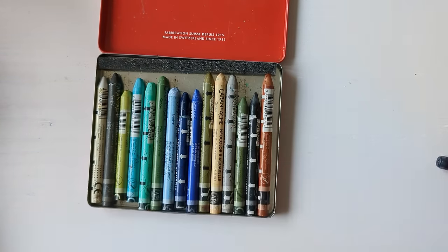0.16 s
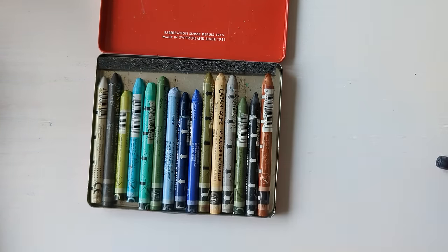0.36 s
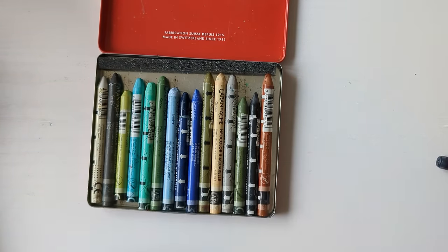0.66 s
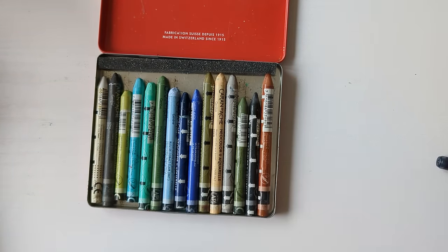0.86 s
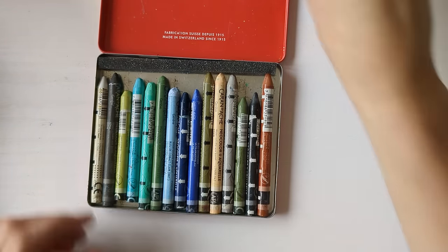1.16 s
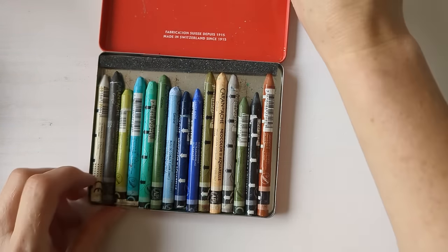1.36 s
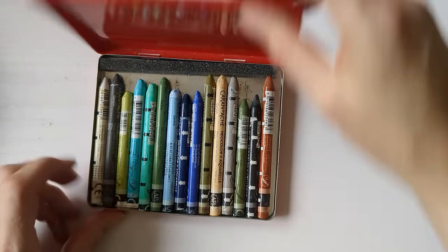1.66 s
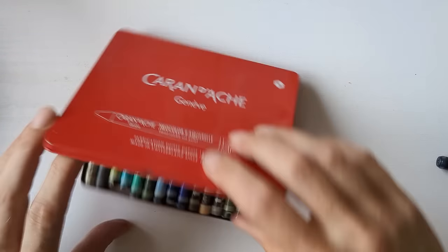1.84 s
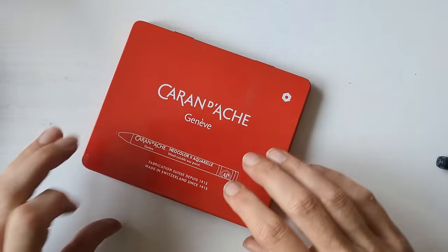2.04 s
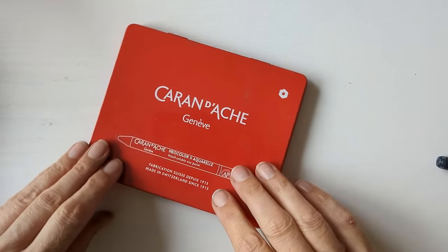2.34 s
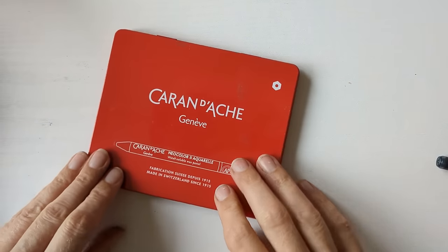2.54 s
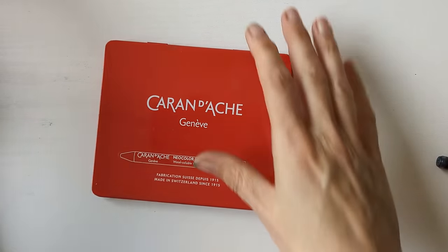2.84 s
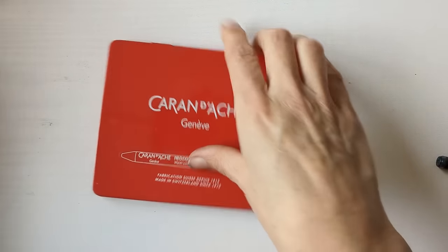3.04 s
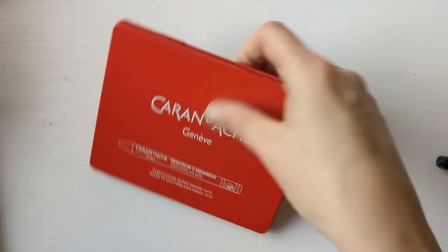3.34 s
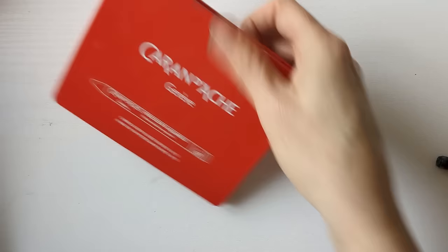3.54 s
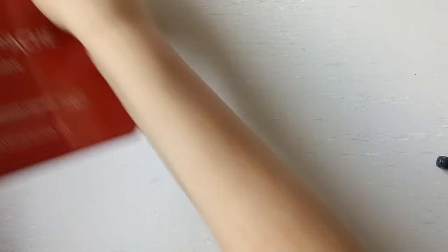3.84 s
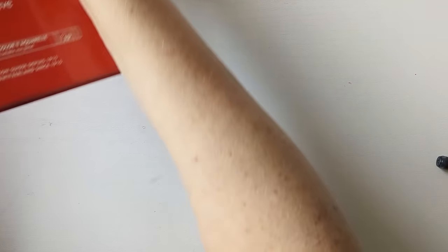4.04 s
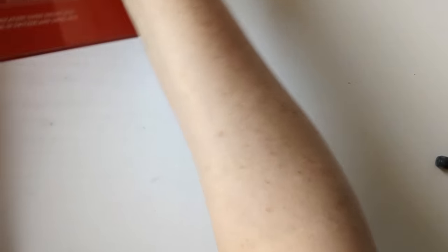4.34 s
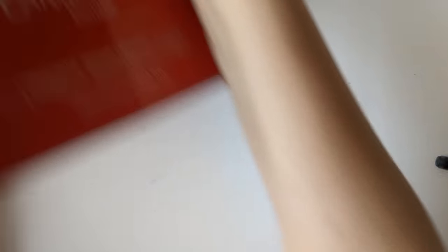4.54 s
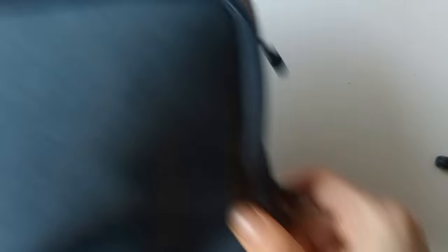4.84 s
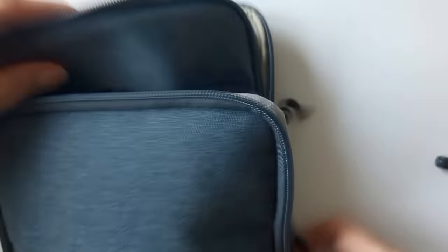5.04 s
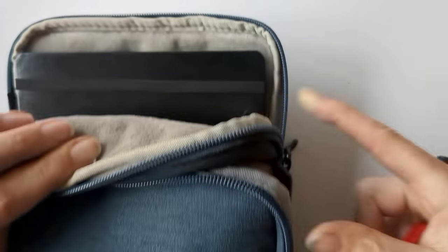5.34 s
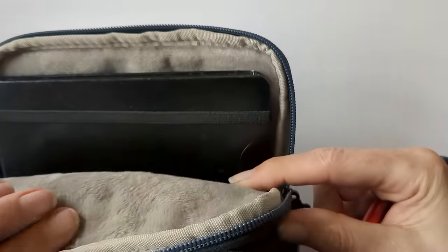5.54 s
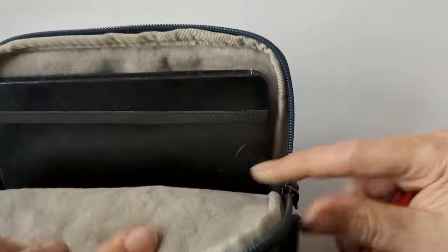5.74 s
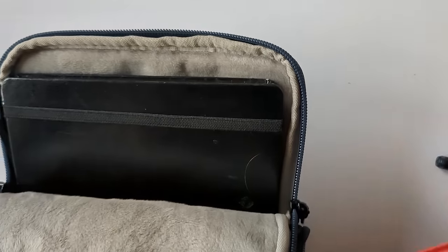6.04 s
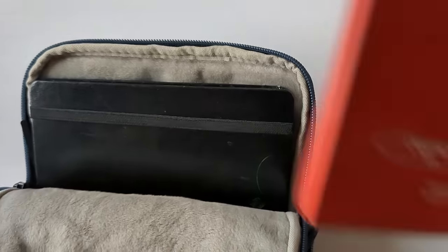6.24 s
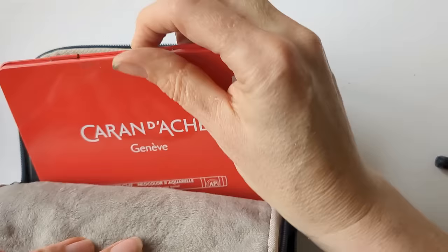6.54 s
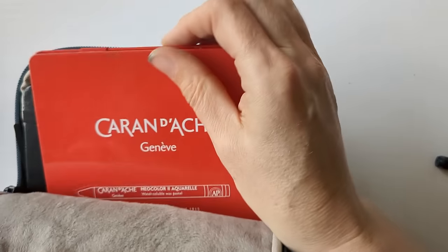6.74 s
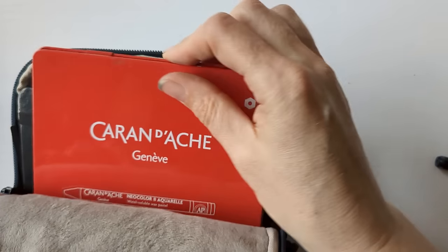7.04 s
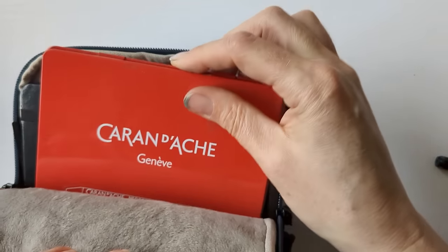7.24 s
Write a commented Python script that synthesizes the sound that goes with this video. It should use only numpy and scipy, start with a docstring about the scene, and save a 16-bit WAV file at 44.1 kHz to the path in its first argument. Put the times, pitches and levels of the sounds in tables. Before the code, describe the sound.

Close stereo microphone in a small quiet room. After a nearly silent opening, a thin metal lid clacks and snaps shut on a tin of wax crayons. The tin scrapes and rattles as it is lifted. A padded fabric case lands with soft flaps, rustles open with tiny zip tinkles and a snap, then takes the tin with a cluster of hollow knocks.

```python
"""Over faint rumble and air noise in a small quiet room, a flat metal tin of wax crayons is closed on a table:
the lid drops, snaps shut, and the crayons clatter as the tin is lifted. A padded fabric case is pulled over and
flopped open, its zip pulls tinkling, and the tin is pushed inside. Knocks and bumps are noise bursts with struck
modes, rubbing is trains of tiny slips, slides are noise on a gliding pitch, tinkles are high modes set chattering."""
import sys
import numpy as np
from scipy import signal
from scipy.fft import rfft, irfft, next_fast_len
from scipy.io import wavfile

SR = 44100
rng = np.random.default_rng(int(sys.argv[2]) if len(sys.argv) > 2 else 0)


def wav_out(sig):
    """Save sig, one row per channel (or a flat mono array), as 16-bit PCM at SR to the path in sys.argv[1]."""
    wavfile.write(sys.argv[1], SR, np.round(np.clip(np.atleast_2d(sig).T, -1, 1) * 32767).astype(np.int16))


N = 325450
TIME = np.arange(N) / SR
HIT = SR // 3  # samples that one blow lasts

# Levels in the tables are relative: each layer is trimmed again where it is mixed.
# spectrum of bright ticks and scuffs: (frequency [Hz], density [dB per Hz])
TICK_COLOUR = [(2000, 1.5), (3700, 1), (5200, -6), (6600, -5), (8000, -9), (10500, -2.5), (13000, -7.5),
               (16000, -19)]
# rumble of table and room: (frequency [Hz], density [dB per Hz])
RUMBLE_SPECTRUM = [(22, -16), (45, 0.5), (65, 4), (90, 0), (125, 7), (180, -7.5), (320, -16.5)]
# resonances in the hollow of the case: (frequency [Hz], level [dB], t60 [s])
HOLLOW_MODES = [(354.5, 0, 0.054), (414, -5, 0.16), (457, -1.5, 0.14), (507, -4, 0.17), (534.6, 2, 0.1),
                (656, -11, 0.13), (696, -11, 0.082), (817, 0, 0.046), (920, -18, 0.042), (997, 2, 0.056)]


def from_db(db):
    """Decibels to gain."""
    return 10 ** (np.asarray(db) / 20)


def rms_one(x):
    """Scale to rms 1."""
    return x / np.sqrt(np.mean(x ** 2) + 1e-20)


def unit_blow(x):
    """Scale a blow to the energy of 10 ms at rms 1."""
    return rms_one(x) * np.sqrt(.01 * SR / x.shape[-1])


def level_curve(rows):
    """Read a (time, level) table at every sample."""
    s, level_db = np.transpose(rows)
    return np.interp(TIME, s, level_db)


def at_hz(points, hz):
    """Read a table on a log-frequency axis."""
    f, value = np.transpose(points)
    return np.interp(np.log(hz + 1e-3), np.log(f), value)


def add(out, s, x):
    """Mix x into out from time s on."""
    start = round(s * SR)
    out[:, start:start + x.shape[-1]] += x[:, :N - start]


def colour(x, spectrum):
    """Causal (minimum-phase) filter with this spectrum, falling 24 dB in the octave beyond each end."""
    size = 2 * next_fast_len(x.shape[-1] // 2 + 2048)
    hz = np.fft.rfftfreq(size, 1 / SR)
    low_hz, low_db = spectrum[0]
    high_hz, high_db = spectrum[-1]
    closed = [(low_hz / 2, low_db - 24), *spectrum, (high_hz * 2, high_db - 24)]
    # folding the cepstrum onto positive time gives minimum phase
    cepstrum = irfft(np.log(from_db(at_hz(closed, hz))))[:size // 2]
    cepstrum[1:] *= 2
    response = np.exp(rfft(cepstrum, size))
    return irfft(rfft(x, size) * response)[..., :x.shape[-1]]


def spread(pair):
    """Two unrelated signals become left and right: alike in the bass, apart in the treble."""
    # stereo width: (frequency [Hz], left-right likeness [0 to 1])
    likeness = [(100, 0.9), (400, 0.91), (1200, 0.53), (2200, 0.11), (6000, .05), (16000, .05)]
    size = pair.shape[-1]
    alike = at_hz(likeness, np.fft.rfftfreq(size, 1 / SR))
    mid, side = irfft(rfft(pair) * np.sqrt([1 + alike, 1 - alike]), size)
    return np.array([mid + side, mid - side])


def grains(size, per_s, uneven_db):
    """Two trains of tiny contacts at random moments, of random sign and uneven size."""
    sizes = from_db(uneven_db * np.minimum(rng.exponential(1, (2, size)), 4))
    signs = rng.choice([-1, 1], (2, size))
    happens = rng.random((2, size)) < per_s / SR
    return sizes * signs * happens


def coloured_noise(spectrum):
    """Steady stereo noise with this spectrum, at rms 1."""
    return rms_one(colour(spread(rng.standard_normal((2, N))), spectrum))


def contact(t60, rattle_db, rattle_t60):
    """A burst of contacts over a sparser rattle that dies away at its own rate."""
    t = TIME[:HIT]
    burst = unit_blow(grains(HIT, 12000, 3.7) * from_db(-60 * t / t60))
    rattle = unit_blow(grains(HIT, 800, 2.9) * from_db(-60 * t / rattle_t60))
    dying_out = 1 - (t / t[-1]) ** 2
    return spread(burst + from_db(rattle_db) * rattle) * dying_out


def ring(modes, vary_db, apart):
    """Struck modes fade, stirred a little differently by each blow, with a random phase (apart, rad) per side."""
    hz, level_db, t60 = np.transpose(modes)[:, :, None]
    t = TIME[:HIT]
    sign = np.resize([1, -1], hz.shape)  # neighbouring modes start in opposite directions
    stirred_db = level_db + vary_db * rng.standard_normal(hz.shape)
    fading = sign * from_db(stirred_db - 60 * t / t60)
    phase = apart * rng.standard_normal((2, len(modes)))
    turn = 2 * np.pi * hz * t
    return unit_blow(np.cos(phase) @ (fading * np.sin(turn)) + np.sin(phase) @ (fading * np.cos(turn)))


def swell(rise_s):
    """A soft contact builds up over a moment."""
    return 1 - np.exp(-TIME[:HIT] / rise_s)


def background(rumble_db, air_db):
    """Low rumble of table and room, slowly changing in level, under a faint even hiss."""
    # course of the rumble: (time [s], level [dB])
    rumble_levels = [(0.0, -63), (0.88, -71), (1.29, -58.5), (1.56, -62), (2.46, -58), (2.65, -62.5),
                     (5.1, -55.5), (6.49, -63), (7.07, -47), (7.38, -53)]
    # spectrum of the air noise: (frequency [Hz], density [dB per Hz])
    air_spectrum = [(150, -15), (300, -19), (550, -19), (900, -29), (1500, -24.5), (2800, -20), (4500, -22),
                    (8000, -33.5), (11000, -27.5), (16000, -37)]
    rumble = from_db(level_curve(rumble_levels) + rumble_db) * coloured_noise(RUMBLE_SPECTRUM)
    return rumble + from_db(air_db) * coloured_noise(air_spectrum)


def friction(spectrum, per_s, uneven_db, catch_db):
    """Countless tiny slips of one surface over another, in clumps as it catches and lets go; rms 1."""
    moments = np.arange(0, N / SR, .018)  # the grip is drawn anew every 18 ms
    grip = from_db(catch_db * np.interp(TIME, moments, rng.standard_normal(len(moments))))
    return rms_one(colour(spread(grip * grains(N, per_s, uneven_db)), spectrum))


def rubbing_gains():
    """Drag, swish and hiss: light contact that comes and goes with the handling, plus strokes that rise and fade."""
    # light contact of the surfaces: (time [s], level [dB])
    handling = [(0, -66), (1.2, -88), (2.55, -60.5), (2.9, -59), (3.7, -51), (4.4, -54), (6.3, -50),
                (7.38, -59)]
    # strokes of tin over table and cloth over tin:
    # (time of peak [s], length [s], drag level [dB], swish level [dB], hiss level [dB])
    strokes = [(1.72, 0.13, -49, -56, -80), (1.966, .24, -43, -41, -64), (3.157, 0.24, -45, -42, -51.5),
               (3.26, 0.24, -64, -41, -62), (3.416, 0.076, -46, -40.5, -57), (3.766, 0.16, -59, -46, -58),
               (4.163, 0.22, -44, -62, -75), (4.44, 0.066, -31.5, -39, -48), (4.548, 0.21, -28.5, -41, -68),
               (4.813, 0.05, -44, -52, -59), (5.12, 0.42, -42, -42, -49), (5.505, 0.48, -48, -49, -59),
               (5.642, 0.21, -34, -35.5, -51), (5.799, 0.16, -30, -37, -48), (6.133, 0.15, -52, -61, -73),
               (6.527, .11, -50, -26, -45), (6.922, 0.26, -38.5, -47.5, -74), (7.298, 0.2, -43, -43, -77)]
    fade_db, rise_share = 19, 0.5  # fades this much per length; builds up in this share of the fading time
    contact_db = [[-3.5], [-1], [-11.5]]  # drag, swish, hiss, relative to the handling curve
    power = from_db(level_curve(handling) + np.array(contact_db)) ** 2
    for s, length, *levels_db in strokes:
        away = np.maximum(TIME - s, (s - TIME) / rise_share) / length
        power += np.outer(from_db(levels_db), from_db(-fade_db * away)) ** 2
    return np.sqrt(power)


def rubbing(drag_db, swish_db, hiss_db, brush_db, table_db):
    """Coarse slips drum on the case and shake the table, finer ones swish, the weave hisses, hands brush past."""
    # brief brushes of skin and cloth: (time of middle [s], spread either side [s], level [dB])
    brushes = [(3.052, 0.038, -49.5), (3.885, 0.06, -46.5), (4.12, 0.039, -52), (4.87, 0.018, -46.5),
               (5.547, 0.019, -49), (5.722, 0.016, -42), (5.814, 0.04, -41.5), (5.9, 0.022, -49),
               (6.9, 0.016, -115), (7.326, 0.038, -57)]
    # spectra of the four kinds of rubbing: (frequency [Hz], density [dB per Hz])
    drag_colour = [(130, -19), (280, -0.5), (450, 2.5), (800, 0.5), (1300, -9)]
    swish_colour = [(600, -25), (1100, -3.5), (1500, -6), (2400, -9), (4000, -14), (6500, -23)]
    hiss_colour = [(3000, 4), (5000, -13), (7000, -2), (9000, -3), (12000, -1), (14000, -5), (16000, -20.5)]
    brush_colour = [(300, 0.5), (700, -2.5), (1500, 0.5), (3000, -3.5), (5000, -6), (8000, -8.5),
                    (12000, -6), (16000, -19)]
    drag_gain, swish_gain, hiss_gain = rubbing_gains()
    brush_gain = sum(from_db(level_db) * np.exp(-((TIME - s) / width) ** 2 / 2)
                     for s, width, level_db in brushes)
    drag = from_db(drag_db) * friction(drag_colour, per_s=600, uneven_db=2.5, catch_db=1.0)
    shaking = from_db(table_db) * coloured_noise(RUMBLE_SPECTRUM)
    swish = from_db(swish_db) * friction(swish_colour, per_s=4700, uneven_db=2.5, catch_db=2.5)
    hiss = from_db(hiss_db) * friction(hiss_colour, per_s=7100, uneven_db=3.5, catch_db=0.5)
    brush = from_db(brush_db) * friction(brush_colour, per_s=8000, uneven_db=1.0, catch_db=5.0)
    return drag_gain * (drag + shaking) + swish_gain * swish + hiss_gain * hiss + brush_gain * brush


def bump_contacts():
    """Each bump lands, then the padding gives way and it lands again more softly."""
    # soft bumps of hands and padded case: (time [s], flap level [dB], thump level [dB], scuff level [dB])
    soft_bumps = [(0.156, -76, -55, -85), (3.188, -39, -33, -30.5), (3.81, -46.5, -43, -54),
                  (4.194, -40.5, -40.5, -70), (4.433, -26.5, -29.5, -43.5), (4.516, -19, -27, -34.5),
                  (4.595, -27, -39, -60), (5.018, -28, -43, -46), (5.048, -21.5, -20, -39.5),
                  (5.115, -51, -30, -59), (5.434, -35.5, -39, -46.5), (5.635, -33.5, -44, -43),
                  (6.059, -39.5, -53, -75), (6.787, -36.5, -48, -61), (7.056, -49, -41, -58),
                  (7.182, -54, -39.5, -78), (7.215, -58, -42, -78), (7.288, -44, -45, -70)]
    settle_s, settle_loss_db = .021, 8
    for s, *levels_db in soft_bumps:
        yield s, *levels_db
        yield s + settle_s, *(np.array(levels_db) - settle_loss_db)


def bumps(flap_db, hollow_db, thump_db, scuff_db):
    """Padded things land slowly: a dull flap, the hollow of the case, a thump of the table top and a scuff."""
    # table top: (frequency [Hz], level [dB], t60 [s])
    table_modes = [(86, 3.5, 0.042), (109, 3.5, 0.16), (153, 4, 0.1), (206.5, 4.5, 0.05),
                   (277, -2.5, 0.089)]
    # spectrum of the flap: (frequency [Hz], density [dB per Hz])
    flap_colour = [(200, -15), (330, -2.5), (480, 2), (700, -1), (950, 3), (1300, -2), (2500, -8.5),
                   (5000, -33.5)]
    out = np.zeros((2, N))
    giving = swell(rise_s=.0025)
    for s, flap_level, thump_level, scuff_level in bump_contacts():
        flap_burst = contact(t60=0.022, rattle_db=-5.5, rattle_t60=0.2)
        flap = from_db(flap_db) * unit_blow(colour(flap_burst, flap_colour))
        hollow = from_db(hollow_db) * ring(HOLLOW_MODES, vary_db=2.5, apart=.18)
        thump = from_db(thump_db) * ring(table_modes, vary_db=2.0, apart=.05)
        scuff_burst = contact(t60=0.059, rattle_db=4.0, rattle_t60=0.19)
        scuff = from_db(scuff_db) * unit_blow(colour(scuff_burst, TICK_COLOUR))
        add(out, s, giving * from_db(flap_level) * (flap + hollow))
        add(out, s, giving * (from_db(thump_level) * thump + from_db(scuff_level) * scuff))
    return out


def slides():
    """A stroke stirs a resonance that swells and ebbs, gliding in pitch as the surfaces pass over each other."""
    # gliding strokes: (start [s], peak [s], end [s], first pitch [Hz], last pitch [Hz], level [dB], sharpness Q)
    glides = [(0.993, 1.24, 1.36, 46.9, 54.2, -53, 3.2), (1.256, 1.268, 1.42, 2210, 2310, -56.5, 1.7),
              (1.332, 1.35, 1.38, 788, 670, -46.5, 24), (3.097, 3.115, 3.18, 796, 686, -37.5, 12),
              (3.819, 3.933, 4.09, 660, 325, -46, 2), (5.201, 5.234, 5.44, 2146, 1306, -39.5, 1.7),
              (6.052, 6.145, 6.44, 1109, 1397, -43.5, 1.4), (6.112, 6.202, 6.29, 3460, 4170, -51, 3.1)]
    out = np.zeros((2, N))
    for start, peak, end, first_hz, last_hz, level_db, q in glides:
        t = np.arange(start, end, 1 / SR)
        hz = np.geomspace(first_hz, last_hz, len(t))
        pressure = np.interp(t, [start, peak, end], [0, 1, 0])
        slips = rng.standard_normal((2, 2, len(t)))
        # slow noise turned up to the gliding pitch is a moving narrow band
        half_band_hz = hz.mean() / (2 * max(q, 1))
        sway = signal.sosfilt(signal.butter(2, half_band_hz, fs=SR, output="sos"), slips)
        turn = 2 * np.pi * np.cumsum(hz) / SR
        tone = spread(sway[0] * np.cos(turn) + sway[1] * np.sin(turn))
        add(out, start, from_db(level_db) * pressure * rms_one(tone))
    return out


def knock_contacts():
    """A light knock touches once; a hard one grazes, strikes and rebounds; the loud-ticking catch has no graze."""
    # knocks, light and hard, of lid, crayons and case fittings:
    # (time [s], ring level [dB], thud level [dB], tick level [dB], pitch of the struck spot [Hz])
    knocks = [(1.268, -60, -53, -69, 2300), (1.34, -54, -50, -55.5, 710), (1.367, -40, -64, -50, 1570),
              (1.377, -37, -39.5, -38, 1770), (1.594, -57.5, -62, -63.5, 2060),
              (1.658, -50, -52, -64, 1640), (1.78, -17.5, -28.5, -26, 1350), (1.852, -26, -47, -33, 2310),
              (1.933, -37, -49, -52, 1310), (1.964, -18.5, -43, -41, 1383),
              (2.037, -29.5, -38.5, -53, 1400), (2.064, -35, -50, -68, 960),
              (2.273, -50.5, -58, -77.5, 970), (2.3793, -11, -20.5, -18.5, 1400),
              (2.383, -17.5, -24.5, -18, 975), (2.395, -20, -22, -43, 994), (2.638, -49, -57, -67, 1230),
              (2.943, -50.5, -66, -58.5, 1082), (2.984, -64, -56, -52, 3030),
              (3.103, -32.5, -45, -54, 1074), (3.111, -29.5, -43, -45, 1200),
              (3.203, -26.5, -27.5, -29, 1200), (3.298, -27, -41, -42, 1700), (3.304, -27, -44, -56, 1320),
              (3.321, -33.5, -33.5, -40.5, 1960), (3.45, -38.5, -39.5, -44.5, 1430),
              (3.705, -17, -30.5, -32, 1410), (3.725, -28.5, -38, -44, 2510),
              (5.2, -27.5, -33.5, -48, 1780), (5.647, -23, -36, -43, 617), (6.384, -33, -45, -38.5, 1440),
              (6.391, -33.5, -49, -46, 2780), (6.45, -18.5, -13, -35, 650),
              (6.461, -12.5, -12.5, -24, 1190), (6.469, -11, -24, -27, 2047), (6.494, -9, -17, -27.5, 1256),
              (6.508, -20, -25, -49, 1200), (6.537, -8, -9, -28, 1130), (6.55, -14, -39, -31.5, 1240),
              (6.959, -15, -26, -36.5, 1720), (6.976, -15.5, -25.5, -32, 1320)]
    hard_db, snap_tick_db = -26.5, -19  # ring above which a knock is hard; tick from which it is the catch
    strike, rebound, graze = (0.0006, 0.0049), (.009, 13.5), (-0.0046, 14.5)  # (delay s, loss dB)
    for s, ring_db, thud_db, tick_db, hz in knocks:
        touches = [strike]
        if ring_db > hard_db:
            touches.append(rebound)
            if tick_db < snap_tick_db:
                touches.append(graze)
        for delay, loss in touches:
            yield s + delay, ring_db - loss, thud_db - loss, tick_db - loss, hz


def tin(clack_db, spot_db, modes_db, thud_db, box_db, hollow_db, tick_db, scatter_db):
    """Each knock: a clack of wax on metal, a short note of the struck spot, the ringing sheet, a thud and a tick."""
    # thin sheet metal loaded with crayons: (frequency [Hz], level [dB], t60 [s])
    sheet_modes = [(783, -1, 0.064), (939, -4.5, 0.092), (1010, 3.5, 0.045), (1085, -3, 0.1),
                   (1155, -36, .08), (1179, 9, 0.039), (1410, -21, 0.072), (1396, 2.5, 0.042),
                   (1538, 11.5, 0.034), (1604, 9.5, 0.067), (1710, -7.5, 0.12), (2038, 6, 0.13),
                   (2147, 9.5, 0.013), (2390, -18, 0.092), (2510, -12.5, 0.14), (2730, -31.5, 0.038),
                   (2940, -4, 0.094)]
    # the whole box and the table under it: (frequency [Hz], level [dB], t60 [s])
    boom_modes = [(97, -5.5, 0.17), (110, 1.5, 0.28), (151.2, 1, 0.29), (191.4, 1, 0.14), (224, -3.5, 0.29),
                  (272.5, -1.5, 0.18), (348, -10, 0.17), (494, -2, 0.069), (592, -1, 0.054)]
    # spectra of clack and thud: (frequency [Hz], density [dB per Hz])
    clack_colour = [(500, -22), (800, 3.5), (1250, 8), (2000, 6.5), (3200, -0.5), (4500, -10.5),
                    (7000, -33)]
    thud_colour = [(100, -17), (150, -2), (210, -4), (280, -1), (480, 2), (650, 1), (1000, -31.5)]
    lifted_s, in_case_s = 3.5, 6.4
    out = np.zeros((2, N))
    yielding = swell(rise_s=0.0013)
    for s, ring_level, thud_level, tick_level, hz in knock_contacts():
        clack_burst = yielding * contact(t60=0.016, rattle_db=-3, rattle_t60=0.07)
        clack = from_db(clack_db) * unit_blow(colour(clack_burst, clack_colour))
        note = ring([(hz, 0, .016)], vary_db=0, apart=0.61)  # damped by the crayons
        spot = from_db(spot_db) * unit_blow(swell(rise_s=0.0024) * note)
        sheet = from_db(modes_db) * ring(sheet_modes, vary_db=3.0, apart=.55)
        thud_burst = contact(t60=0.02, rattle_db=-8, rattle_t60=0.27)
        thud = from_db(thud_db) * unit_blow(colour(thud_burst, thud_colour))
        if s < lifted_s:  # box and table boom together while they touch
            body = from_db(box_db) * ring(boom_modes, vary_db=5.0, apart=.08)
        else:  # afterwards the case answers
            body = from_db(hollow_db) * ring(HOLLOW_MODES, vary_db=4.0, apart=0.55)
        tick_burst = swell(rise_s=.0004) * contact(t60=.009, rattle_db=-6, rattle_t60=.02)
        tick = from_db(tick_db) * unit_blow(colour(tick_burst, TICK_COLOUR))
        scatter_burst = contact(t60=0.032, rattle_db=-3.5, rattle_t60=0.082)
        scatter = from_db(scatter_db) * unit_blow(colour(scatter_burst, TICK_COLOUR))
        if s > in_case_s:  # the padding softens a knock and leaves its note
            clack, spot, sheet = from_db(-2.5) * clack, from_db(1.5) * spot, from_db(-1.5) * sheet
        add(out, s, from_db(ring_level) * (clack + spot + sheet))
        add(out, s, from_db(thud_level) * yielding * (thud + body))
        add(out, s, from_db(tick_level) * (tick + scatter) * from_db([[1.7], [-1.7]]))  # leans left
    return out


def tinkles():
    """Hinge and zip pulls chatter and ring very high; a zip slider snaps once against its pull."""
    # tinkling of small metal parts: (time [s], level [dB])
    tinkle_times = [(3.173, -43), (3.204, -44), (5.025, -33.5), (5.062, -31.5), (5.121, -34), (5.449, -45)]
    # small metal parts, then the zip slider: (frequency [Hz], level [dB], t60 [s])
    part_modes = [(11700, -6, .01), (12200, -2, .016), (12550, 0, .016), (12900, -3, .014),
                  (15000, -8, .01)]
    slider_modes = [(2700, -2, 0.013), (3210, 4.5, 0.011), (3860, -5, 0.0075), (5600, -3, 0.0096),
                    (6260, -3, 0.0066)]
    # the one snap of the slider: (time [s], level [dB])
    snap_s, snap_db = (5.648, -24)
    out = np.zeros((2, N))
    for s, level_db in tinkle_times:
        chatter = contact(t60=.005, rattle_db=-2, rattle_t60=.1)
        metal = ring(part_modes, vary_db=3.0, apart=1.0)
        add(out, s, from_db(level_db) * unit_blow(signal.fftconvolve(chatter, metal, axes=1)))
    add(out, snap_s, from_db(snap_db) * ring(slider_modes, vary_db=1.5, apart=.7))
    return out


def room(x, first_echo_s, early_db, tail_db):
    """Separate echoes off the near walls, and a diffuse tail whose treble dies first."""
    # decay of the room: (frequency [Hz], t60 [s])
    decay_times = [(100, 0.57), (400, 0.46), (1500, 0.41), (4000, 0.4), (9000, 0.32), (16000, 0.33)]
    t = TIME[:SR // 2]
    white = spread(rng.standard_normal((2, len(t))))
    tail = 0
    edges = np.geomspace(60, 18000, 9)  # band edges in Hz
    for low, high in zip(edges, edges[1:]):
        band = signal.sosfilt(signal.butter(2, [low, high], "band", fs=SR, output="sos"), white)
        tail = tail + band * from_db(-60 * t / at_hz(decay_times, np.sqrt(low * high)))
    early = spread(grains(len(t), 500, 2.2)) * from_db(-60 * t / 0.26)
    arrived = t > first_echo_s
    response = from_db(early_db) * rms_one(early * arrived) + from_db(tail_db) * rms_one(tail * arrived)
    return signal.fftconvolve(x, response / np.sqrt(len(t)), axes=1)[:, :N]


def scene():
    """Tin, case and hands on the table, in the room, a touch louder on the left."""
    near = rubbing(drag_db=-3.5, swish_db=0.0, hiss_db=3, brush_db=3.5, table_db=-24)
    near += bumps(flap_db=0, hollow_db=-3, thump_db=-1.5, scuff_db=7.5)
    near += slides()
    near += tin(clack_db=-2.5, spot_db=-4.0, modes_db=-7.5, thud_db=-8.0,
                box_db=-3.5, hollow_db=-7, tick_db=-4, scatter_db=2)
    near += tinkles()
    heard = near + room(near, first_echo_s=.008, early_db=-10.5, tail_db=-12.0)
    return heard * from_db([[.3], [-.3]]) + background(rumble_db=1.5, air_db=-69)


def record(dry):
    """The microphone drops the deepest bass, the loudest peaks are rounded and the top is cut at 16 kHz."""
    lean = signal.sosfilt(signal.butter(4, 40, "high", fs=SR, output="sos"), dry)
    rounded = lean / (1 + lean ** 6) ** (1 / 6)
    return signal.sosfilt(signal.ellip(10, .1, 70, 16000, fs=SR, output="sos"), rounded)


dry = scene()
out = record(dry)
wav_out(out)
```